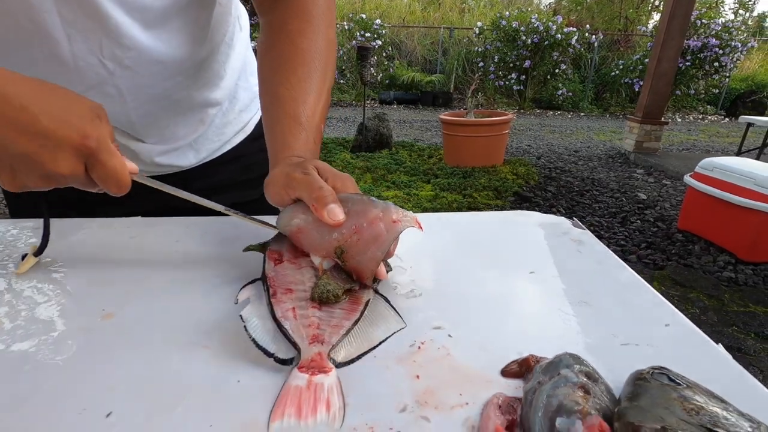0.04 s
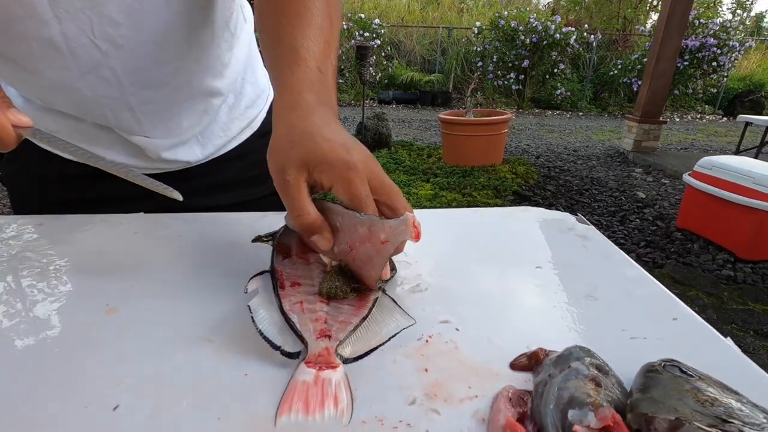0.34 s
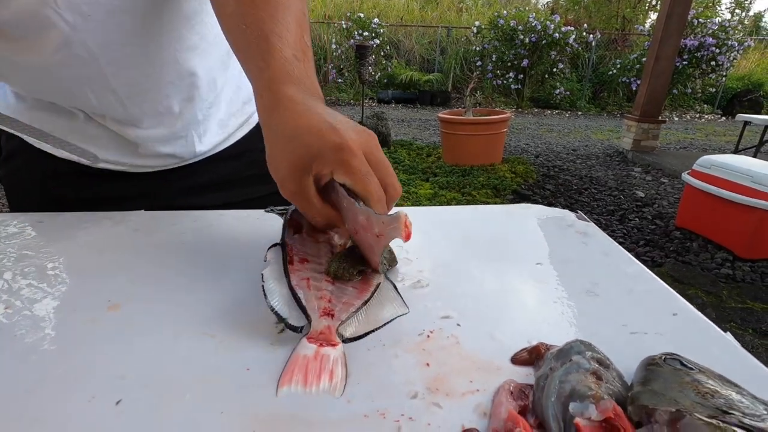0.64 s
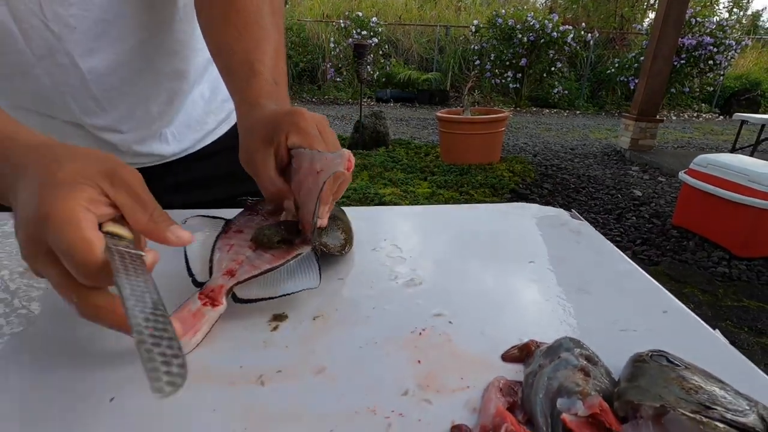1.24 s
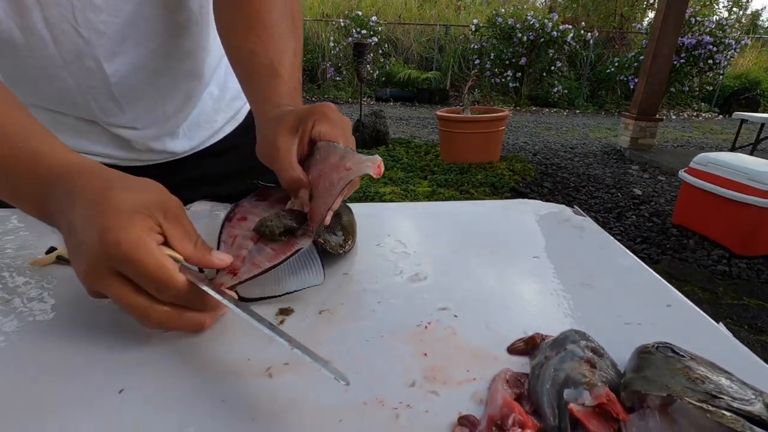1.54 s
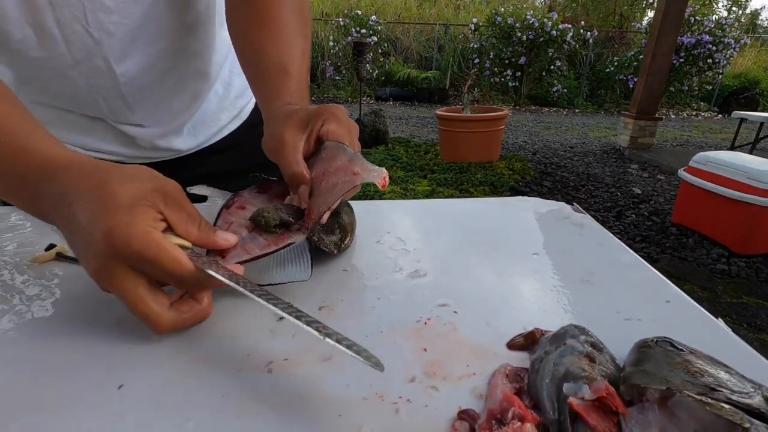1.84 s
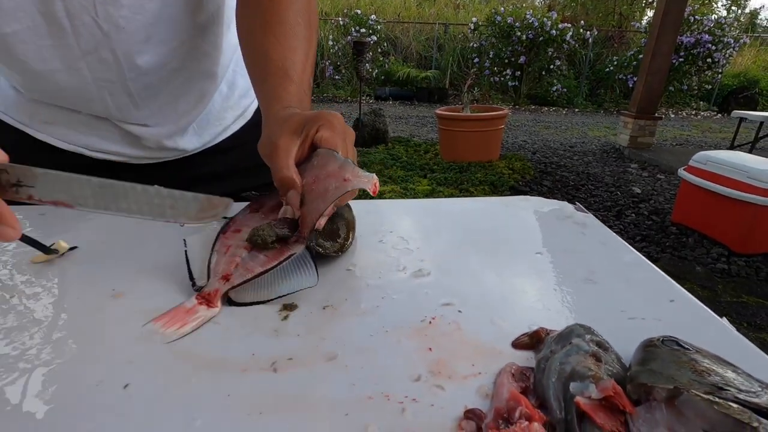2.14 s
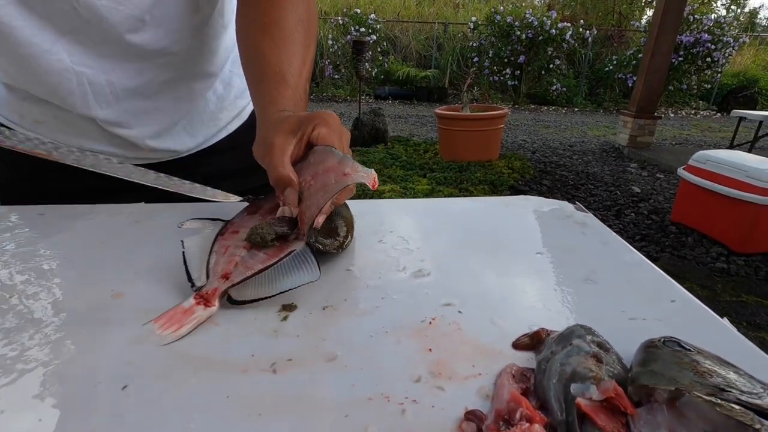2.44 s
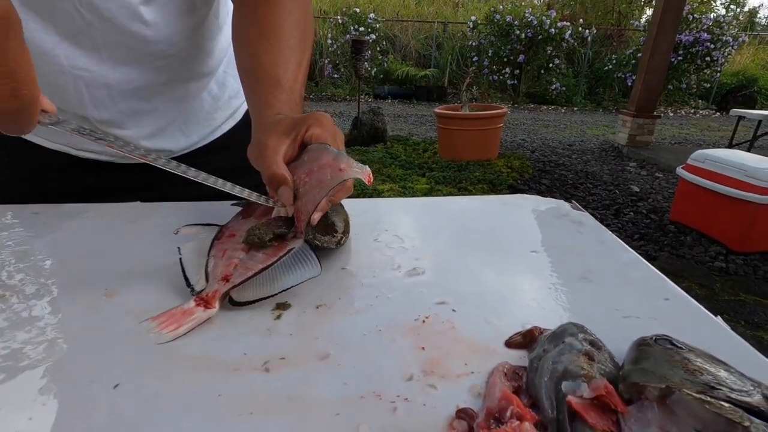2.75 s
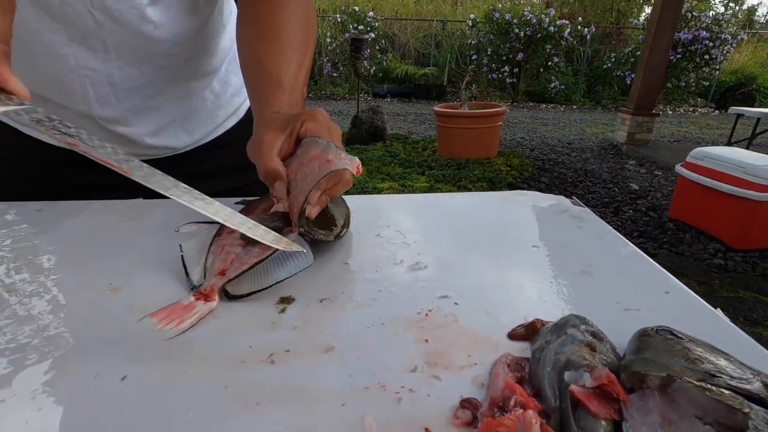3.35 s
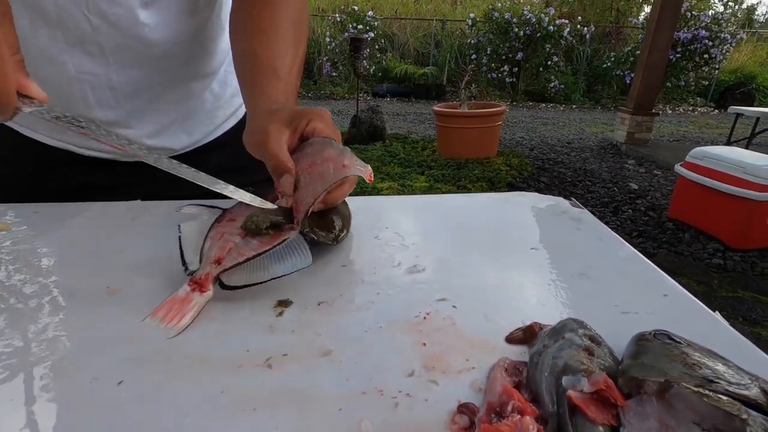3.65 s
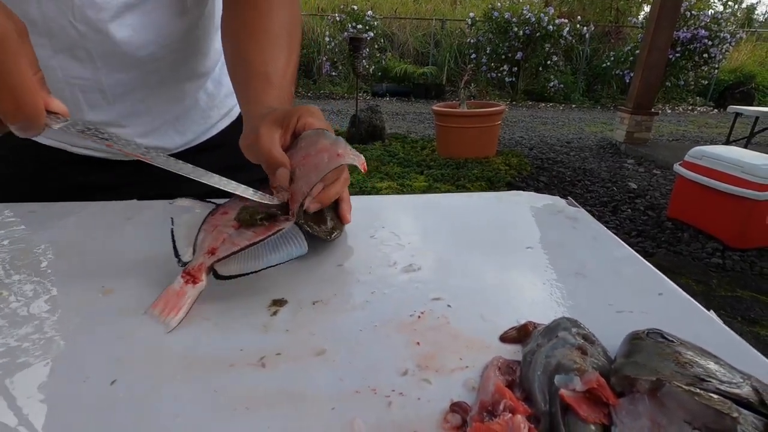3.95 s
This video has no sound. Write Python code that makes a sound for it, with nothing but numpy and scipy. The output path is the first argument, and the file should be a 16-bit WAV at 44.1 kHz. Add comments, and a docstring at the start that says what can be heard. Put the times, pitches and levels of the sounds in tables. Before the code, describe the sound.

A wet fish thumps onto a plastic table, then a knife knocks and briefly scrapes.

```python
"""At an outdoor plastic table, a fish is set down with a dull, wet thump, then slid and turned by hand.
A hard handling knock ends in a short scrape; wet flesh ticks under the fingers and the knife.
Blows are made of dying tones and crackle; slides and scrapes are streams of tiny clicks.
Behind it are low rumble, light wind, a distant motor, insects and a faint high chirring.
The right microphone port is muffled and hollow."""
import sys
import numpy as np
from scipy import signal
from scipy.fft import rfft, irfft
from scipy.io import wavfile
from scipy.ndimage import map_coordinates

SR = 44100
rng = np.random.default_rng(int(sys.argv[2]) if len(sys.argv) > 2 else 0)


def transcribe(u):
    """Save the signal u as a 16-bit wav file named by the first command-line argument.

    u: samples, shape (n,) or (channels, n), limited to [-1, 1]; the rate is SR.
    q: integer samples, one column per channel.
    """
    v = np.clip(np.atleast_2d(u).T, -1, 1)
    q = np.round(v * 32767).astype(np.int16)
    wavfile.write(sys.argv[1], SR, q)


N = 176400
TIME = np.arange(N) / SR
RING_TIME = TIME[:SR // 3]  # the time one blow gets to die away

# rumble of the outdoor air: frequency_hz, relative_db
AIR_SPECTRUM = [(20, -0.5), (45, 4), (160, 2), (230, -11), (300, -17.5), (520, -20), (1600, -27),
                (4500, -43), (7500, -49.5), (10000, -85), (15000, -80.5)]
# wind at the microphone: frequency_hz, relative_db
WIND_SPECTRUM = [(15, 0.5), (38, 5.5), (60, -5.5), (110, -33.5), (600, -31), (1500, -45.5), (12000, -79.5)]
# insect chorus: pitch_hz, width_hz, level_db
INSECT_BANDS = [(5620, 310, -69), (6120, 640, -73.5), (7880, 510, -87)]
# tone of a thin high sizzle: frequency_hz, relative_db
SIZZLE_SPECTRUM = [(3000, -2), (7900, -4), (10000, -17.5), (15000, -23)]
# loudness of the sizzle: time_s, level_db
SIZZLE_LEVELS = [(.5, -66.5), (.75, -63.5), (1.8, -74), (2.6, -68.5), (2.8, -95), (3.7, -86), (3.9, -70.5)]
# path of the high chirring: time_s, pitch_hz, level_db
CHIRR_PATH = [(1.73, 6500, -85), (1.88, 8330, -83), (1.99, 8050, -84), (2.14, 9250, -72), (2.25, 9200, -71),
              (2.36, 8700, -72), (2.54, 9600, -73), (2.641, 8540, -74.5), (2.79, 6740, -89)]
# tones in the chirring: pitch_ratio, relative_db
CHIRR_TONES = [(.78, -8), (.9, -6.5), (1, -7), (1.14, -10), (1.48, -9)]
# distant drone: middle_s, half_length_s, pitch_hz, width_hz, level_db
DRONE_SWELL = (2.5, 0.33, 225.5, 11.5, -49.5)
# loudness of the motor: time_s, level_db
MOTOR_LEVELS = [(.35, -55), (.53, -38.5), (1.2, -43), (2.1, -50.5), (2.6, -36.5), (3.1, -31.5), (3.55, -38),
                (3.7, -44.5)]
# tones of the motor: pitch_multiple, relative_db
MOTOR_TONES = [(1, 1.5), (2, -16.5)]

# the fish sliding on the table: middle_s, half_length_s, level_db
FISH_SLIDES = [(0.128, 0.023, -41.5), (0.254, 0.035, -46.5), (0.657, 0.051, -48.5), (0.998, 0.062, -51.5),
               (1.587, 0.018, -51)]
# tone of a slide: frequency_hz, relative_db
SLIDE_SPECTRUM = [(100, -11.5), (400, 4.5), (800, -8), (1400, -4), (3000, -9.5), (5000, -16.5),
                  (14000, -44)]
# rubs: middle_s, half_length_s, level_db, pitch_hz, width_octaves, glide_octaves_per_s
FLESH_RUBS = [(0.233, 0.039, -47.5, 4900, 0.62, 0), (0.238, 0.054, -51, 3010, 0.11, 0),
              (0.332, 0.023, -48.5, 4440, 0.37, 3), (1.323, .009, -44, 3700, 0.14, -4.5),
              (1.364, .013, -49.5, 3850, .1, -1), (1.588, 0.015, -54, 5500, 0.37, 1),
              (1.649, 0.03, -55.5, 4300, 0.37, 2.5), (3.456, 0.012, -53.5, 5900, 0.59, 0),
              (3.459, 0.012, -57.5, 3340, 1.2, 0.5), (3.851, 0.015, -50, 1170, 1.44, -1.5)]
# wet flesh letting go: start_s, snap_db, snap_hz, pop_db, thud_db
WET_TICKS = [(0.1214, -33, 4940, -28, -39.5), (0.171, -40, 7200, -45.5, -54),
             (0.223, -17, 5370, -34.5, -38), (0.2681, -34, 7400, -42, -43), (0.2714, -43, 8800, -37, -38),
             (1.6633, -35, 4670, -62, -68), (1.712, -38.5, 4360, -66, -66), (1.721, -46, 7200, -68, -70),
             (2.3294, -28, 6740, -26, -36.5), (3.447, -40, 5900, -52.5, -67)]
# tone of a snap: ratio_to_snap_hz, relative_db
SNAP_SPECTRUM = [(.1, -11), (.47, -4.5), (.75, -1), (1, 7), (1.25, -4.5), (1.5, -8), (1.8, -26), (2.9, -46)]
# handling knocks (longer contact is duller): start_s, ring_db, crack_db, contact_s
HANDLING_KNOCKS = [(1.2795, -12.5, -18, 0.000034), (1.2928, -17, -31, 0.00035), (1.3668, -18, -49, 0.00044),
                   (3.8405, -31, -50, 0.00067)]
# tone of a knock's crack: frequency_hz, relative_db
CRACK_SPECTRUM = [(300, -7.5), (4100, 8), (5200, 18), (5900, 8.5), (7000, 3.5), (9000, -4), (11000, -28),
                  (15000, -39)]
# the hard body that knocks and scrape set ringing: pitch_hz, relative_db, ring_s
HARD_BODY_TONES = [(213, -21, 0.18), (383.4, -15, 0.071), (427.5, -18.5, 0.18), (615, -20.5, 0.1),
                   (698, -14.5, 0.053), (784, -21.5, 0.097), (984, -12, 0.04), (1418, -12.5, 0.051),
                   (2187, 1, 0.027), (2552, -2.5, 0.018), (3274, -12.5, 0.041), (3800, -23, 0.062),
                   (5080, -11.5, 0.014)]
# how hard the scrape presses: time_s, relative_db
SCRAPE_PRESSURE = [(1.281, -61), (1.286, -27.5), (1.3, -29), (1.315, -31.5), (1.367, -34.5), (1.382, -39.5),
                   (1.402, -39.5), (1.426, -53.5)]
# the scrape's push on the hard body: frequency_hz, relative_db
PUSH_SPECTRUM = [(420, 10.5), (2200, -27), (3500, -17)]
# the scrape's own grit: frequency_hz, relative_db
GRIT_SPECTRUM = [(150, -19.5), (400, 9), (1400, 3.5), (3600, -5), (5000, -12.5), (7000, -21.5),
                 (10000, -41)]
# the ringing plastic table top: pitch_hz, relative_db, ring_s
TABLE_TONES = [(75.5, -9, 0.3), (139.4, 0, 0.19), (203.3, -1, 0.124), (228, -10.5, 0.16),
               (336, -9.5, 0.048), (421, -10, 0.12), (593, -25, 0.08)]
# tone of the wet slap: frequency_hz, relative_db
SLAP_SPECTRUM = [(60, -19), (400, 7.5), (800, -11), (2600, -10), (3030, -4), (7800, -14), (11000, -36.5)]
# the fish landing: start_s, thump_db, slap_db
FISH_LANDING = (0.0023, -17, -16.5)
# the right microphone port against the left: frequency_hz, gain_db, lag_radians
PORT_RESPONSE = [(127, -2, 0.06), (440, 0, 0.54), (525, -6, 1.5), (592.5, 13, 2), (681, 12, 4),
                 (880, 4.5, 4.5), (1540, -2, 4.5), (3860, -11, 4.5), (4670, -28, 4), (11700, -39.5, 48.5)]


def amp(db):
    """Turns decibels into a number to multiply by."""
    return 10 ** (np.asarray(db) / 20)


def unit(sound):
    """Scales a sound to an average strength (rms) of 1."""
    return sound / np.sqrt(np.mean(sound ** 2) + 1e-20)


def look_up(points, hz, column=1):
    """Reads between a table's rows, on a log-frequency scale."""
    table = np.transpose(points)
    return np.interp(np.log(hz + 1), np.log(table[0] + 1), table[column])


def level(points):
    """Joins time_s, level_db points into a loudness curve."""
    return amp(np.interp(TIME, *np.transpose(points)))


def add(mix, start_s, sound):
    """Mixes a sound in at a given time."""
    part = mix[max(round(start_s * SR), 0):][:len(sound)]
    part += sound[:len(part)]


def colour(sound, spectrum):
    """Gives a sound a spectrum, using a filter that rings only after each click."""
    hz = abs(np.fft.fftfreq(4096, 1 / SR))
    log_gain = np.log(amp(look_up(spectrum, hz)))
    response = np.exp(np.conj(signal.hilbert(log_gain)))
    taps = np.fft.ifft(response).real[:len(hz) // 2]
    return signal.fftconvolve(sound, taps / np.linalg.norm(taps))[:len(sound)]


def noise(gain):
    """Steady noise, shaped by a function of frequency."""
    hz = np.fft.rfftfreq(N, 1 / SR)
    return unit(irfft(rfft(rng.standard_normal(N)) * gain(hz), N))


def wash(spectrum):
    """Steady noise, shaped by a table."""
    return noise(lambda hz: amp(look_up(spectrum, hz)))


def drift(rate_hz):
    """Random wavering, up to about the given rate."""
    return noise(lambda hz: np.exp(-(hz / rate_hz) ** 2))


def grains(per_s, spread_db):
    """Random clicks of uneven size."""
    size = amp(spread_db * np.minimum(rng.exponential(1, N), 4))
    return unit(size * np.sign(rng.standard_normal(N)) * (rng.random(N) < per_s / SR))


def ring(tones):
    """Tones after a blow: each falls 60 dB in ring_s, and every second one is flipped."""
    return sum((-1) ** k * amp(db - 60 * RING_TIME / ring_s) * np.sin(2 * np.pi * hz * RING_TIME)
               for k, (hz, db, ring_s) in enumerate(tones))


def burst(envelope, spectrum):
    """A short crackle that follows a loudness curve."""
    return colour(np.sign(rng.standard_normal(len(RING_TIME))) * envelope, spectrum)


def swell(middle_s, half_s):
    """A smooth rise and fall."""
    return np.exp(-.5 * ((TIME - middle_s) / half_s) ** 2)


def outdoor_air():
    """The air rumbles low, with a thin sizzle high above."""
    rumble = amp(-42 + .4 * drift(rate_hz=4.2)) * wash(AIR_SPECTRUM)
    return rumble + level(SIZZLE_LEVELS) * wash(SIZZLE_SPECTRUM)


def wind(left_db=-50.5, right_db=-37.5):
    """Light wind blows on each microphone port separately."""
    return np.array([amp(db) * wash(WIND_SPECTRUM) for db in (left_db, right_db)])


def insects():
    """Many insects blend into high, wavering bands of hiss."""
    out = np.zeros(N)
    for pitch_hz, width_hz, db in INSECT_BANDS:
        loudness = amp(db + 1.2 * drift(rate_hz=12))
        out += loudness * noise(lambda hz: 1 / (1 + ((hz - pitch_hz) / width_hz * 2) ** 2))
    return out


def chirring():
    """Faint, very high tones, each blurred with hiss, rise and fall together."""
    times, pitches, levels = np.transpose(CHIRR_PATH)
    pitch_hz = np.interp(TIME, times, pitches)
    out = np.zeros(N)
    for ratio, db in CHIRR_TONES:
        wobble = 1 + .018 * drift(rate_hz=18) + .008 * drift(rate_hz=300)
        blur = unit(1 + drift(rate_hz=600))
        flutter = amp(db + 3.5 * drift(rate_hz=25))
        out += flutter * blur * np.sin(2 * np.pi * np.cumsum(pitch_hz * ratio * wobble) / SR)
    return out * amp(np.interp(TIME, times, levels)) * (TIME > times[0]) * (TIME < times[-1])


def drone():
    """A narrow band of distant noise comes and goes above the motor's hum."""
    middle_s, half_s, pitch_hz, width_hz, db = DRONE_SWELL
    band = noise(lambda hz: np.exp(-((hz - pitch_hz) / width_hz) ** 2))
    return amp(db) * swell(middle_s, half_s) * band


def motor_hum(start_hz=115.85, settled_hz=108.1, settle_s=0.32):
    """A distant motor settles in pitch, swells and fades."""
    pitch_hz = settled_hz + (start_hz - settled_hz) * np.exp(-TIME / settle_s)
    phase = 2 * np.pi * np.cumsum(pitch_hz + .5 * drift(rate_hz=5.3)) / SR
    tones = sum(amp(db + 2.16 * drift(rate_hz=24)) * np.sin(multiple * phase)
                for multiple, db in MOTOR_TONES)
    return level(MOTOR_LEVELS) * tones


def slides():
    """The fish drags over the table with a dull, grainy sound."""
    loudness = sum(amp(db) * swell(middle_s, half_s) for middle_s, half_s, db in FISH_SLIDES)
    return loudness * colour(grains(per_s=5400, spread_db=4.5), SLIDE_SPECTRUM)


def rubs():
    """Flesh, hand and blade rub and squeak: fine grit around one pitch, which may glide."""
    out = np.zeros(N)
    grit = rfft(grains(per_s=5400, spread_db=1.5)[:SR])
    hz = np.fft.rfftfreq(SR, 1 / SR) + 1
    for middle_s, half_s, db, pitch_hz, octaves, glide in FLESH_RUBS:
        band = unit(irfft(grit / (1 + (np.log2(hz / pitch_hz) / octaves) ** 2) ** 2, SR))
        time = np.arange(-4 * half_s, 4 * half_s, 1 / SR)
        speed = 2 ** (glide * time)  # playing the band faster raises its pitch
        position = (rng.random() * SR + np.cumsum(speed)) % (SR - 1)
        loudness = amp(db) * np.exp(-.5 * (time / half_s) ** 2)
        add(out, middle_s + time[0], loudness * map_coordinates(band, [position], order=3))
    return out


def wet_ticks(pop_hz=1306, pop_ring_s=0.014, snap_fade_s=.0011):
    """Wet flesh lets go with a sharp snap and a small pop, and nudges the table."""
    out = np.zeros(N)
    thud, pop = ring(TABLE_TONES), ring([(pop_hz, 0, pop_ring_s)])
    fade = np.exp(-RING_TIME / snap_fade_s)
    envelope = fade + 7.7 * (RING_TIME == 0)  # a spike sharpens the first instant
    envelope *= np.linalg.norm(fade) / np.linalg.norm(envelope)
    for start_s, snap_db, snap_hz, pop_db, thud_db in WET_TICKS:
        snap = burst(envelope, [(ratio * snap_hz, db) for ratio, db in SNAP_SPECTRUM])
        add(out, start_s, amp(snap_db) * snap + amp(pop_db) * pop + amp(thud_db) * thud)
    return out


def scrape(grit_db=-2, ring_db=-3.5):
    """A drag of quick slips rings the hard body and darkens as it eases."""
    slips = grains(per_s=5000, spread_db=.7)
    ringing = unit(signal.fftconvolve(colour(slips, PUSH_SPECTRUM), ring(HARD_BODY_TONES))[:N])
    touching = (TIME > SCRAPE_PRESSURE[0][0]) & (TIME < SCRAPE_PRESSURE[-1][0])
    pressure = level(SCRAPE_PRESSURE) * touching
    # the grit grows faster with pressure than the ringing does
    grit = colour(slips, GRIT_SPECTRUM) * pressure.max() * (pressure / pressure.max()) ** 1.15
    return amp(grit_db) * grit + amp(ring_db) * pressure * ringing


def knocks(crack_fade_s=0.0023):
    """Each knock is a crack and a brief push that rings the hard body."""
    out, body = np.zeros(N), ring(HARD_BODY_TONES)
    for start_s, ring_db, crack_db, contact_s in HANDLING_KNOCKS:
        push = np.sin(np.pi * RING_TIME[RING_TIME < contact_s] / contact_s)
        add(out, start_s, amp(ring_db) * np.convolve(body, push / (push.sum() + 1e-9)))
        add(out, start_s, amp(crack_db) * burst(np.exp(-RING_TIME / crack_fade_s), CRACK_SPECTRUM))
    return out


def fish_landing(slap_hold_s=0.004, slap_fade_s=0.0015, splash_fade_s=0.05):
    """Wet skin slaps the table top, which booms briefly."""
    start_s, thump_db, slap_db = FISH_LANDING
    out = np.zeros(N)
    slap = np.exp(-np.maximum(RING_TIME - slap_hold_s, 0) / slap_fade_s)
    splash = amp(-21.5) * np.exp(-RING_TIME / splash_fade_s)
    add(out, start_s, amp(thump_db) * ring(TABLE_TONES))
    add(out, start_s, amp(slap_db) * burst(slap + splash, SLAP_SPECTRUM))
    return out


def muffled_port(sound):
    """The right microphone port honks around 600-700 Hz and loses the treble."""
    hz = np.fft.rfftfreq(2 * N, 1 / SR)
    gain = amp(look_up(PORT_RESPONSE, hz))
    lag_radians = look_up(PORT_RESPONSE, hz, column=2)
    return irfft(rfft(sound, 2 * N) * gain * np.exp(-1j * lag_radians))[:N]


def scene():
    """Fish and background reach both ports; each port also gets its own wind."""
    handling = fish_landing() + knocks() + scrape() + wet_ticks() + slides() + rubs()
    background = motor_hum() + drone() + outdoor_air() + insects() + chirring()
    sound = handling + background
    return np.array([sound, muffled_port(sound)]) + wind()


def record(dry):
    """Cuts the very highest treble, above 15000 Hz."""
    low_pass = signal.firwin(511, 15000, window=("kaiser", 9), fs=SR)
    return signal.oaconvolve(dry, low_pass[None], "same")


dry = scene()
out = record(dry)
transcribe(out)
```